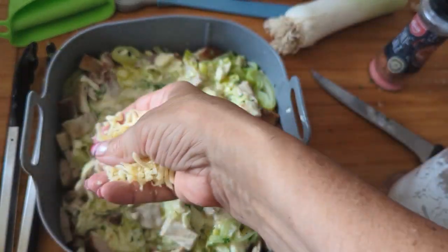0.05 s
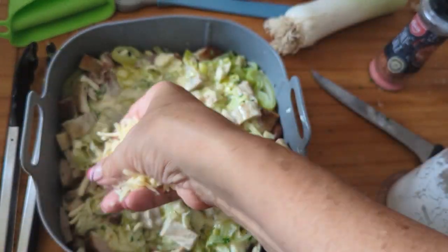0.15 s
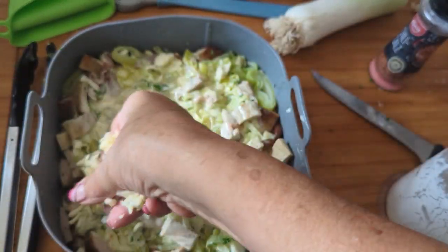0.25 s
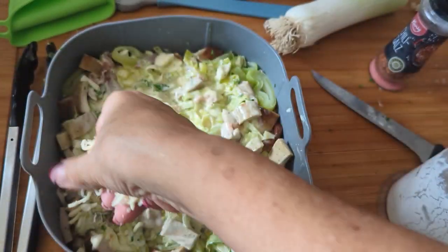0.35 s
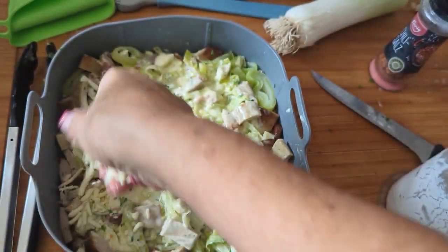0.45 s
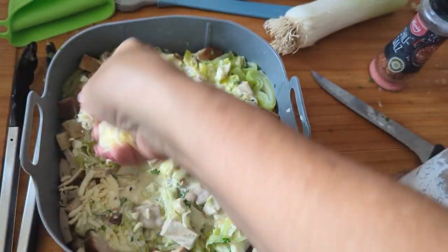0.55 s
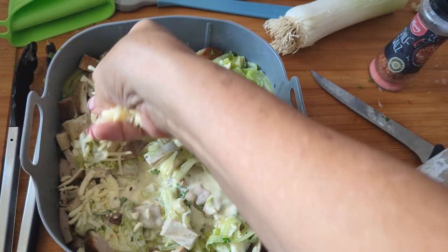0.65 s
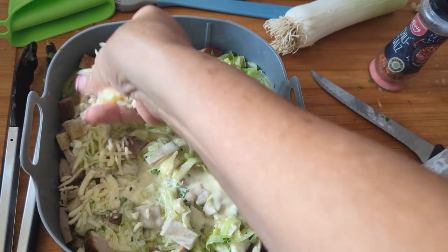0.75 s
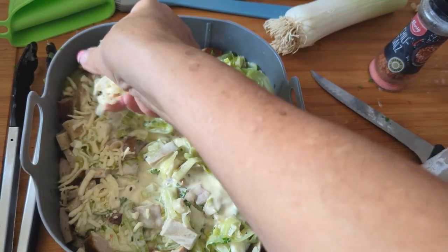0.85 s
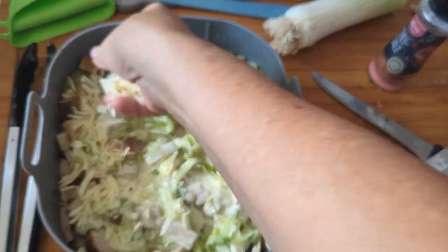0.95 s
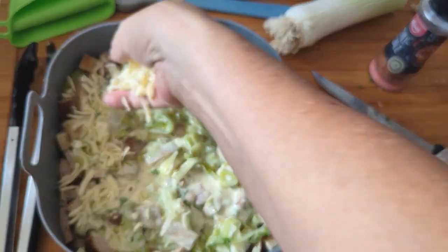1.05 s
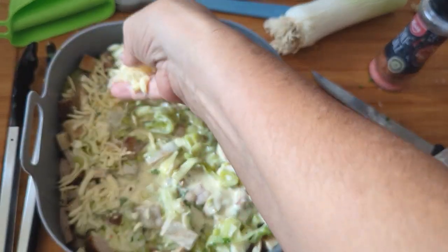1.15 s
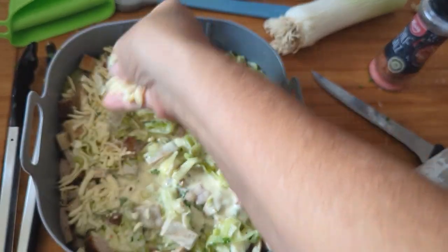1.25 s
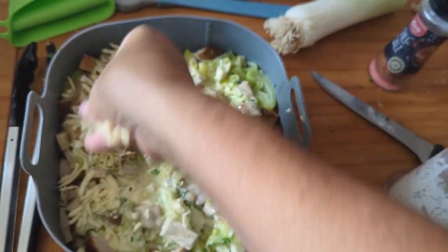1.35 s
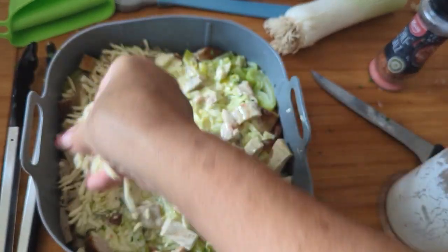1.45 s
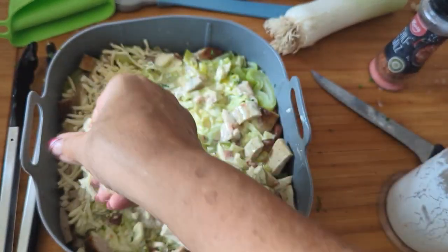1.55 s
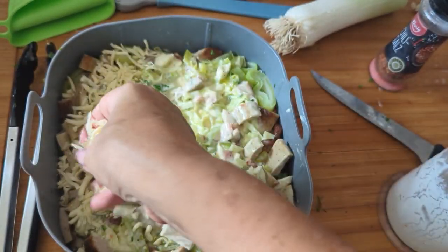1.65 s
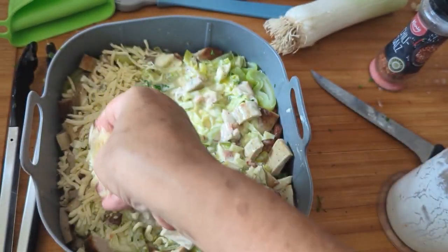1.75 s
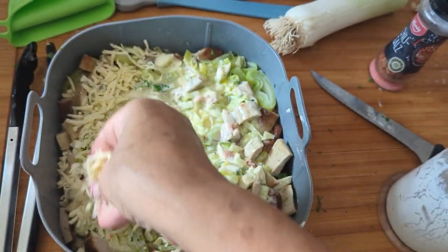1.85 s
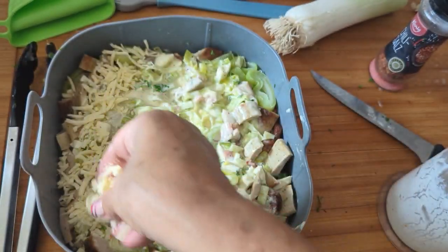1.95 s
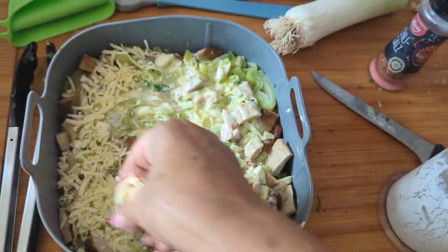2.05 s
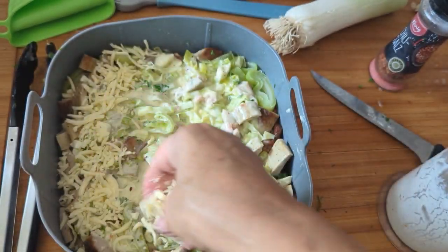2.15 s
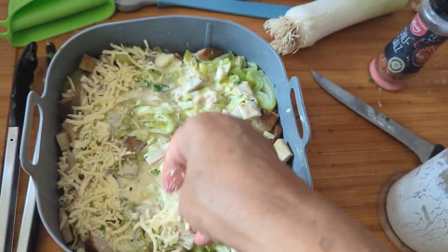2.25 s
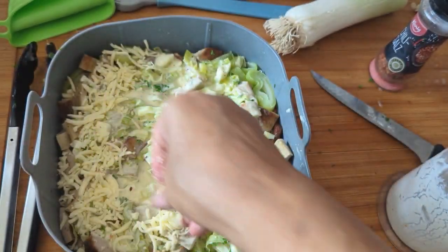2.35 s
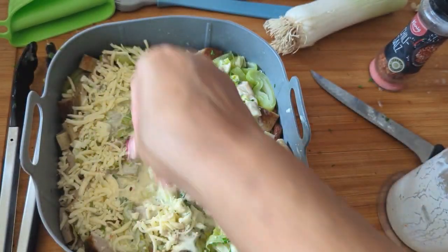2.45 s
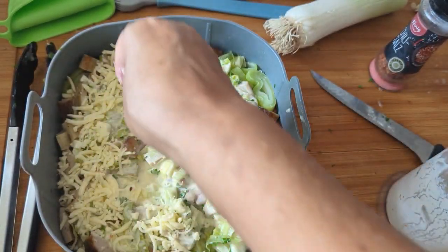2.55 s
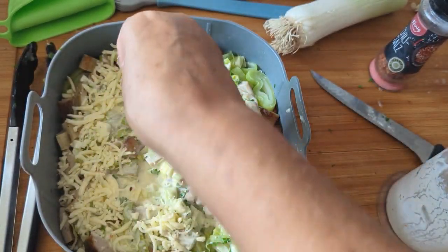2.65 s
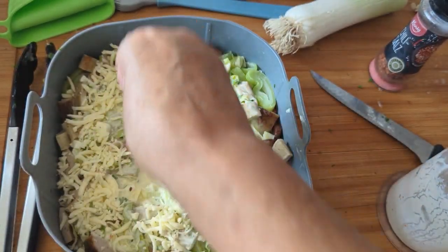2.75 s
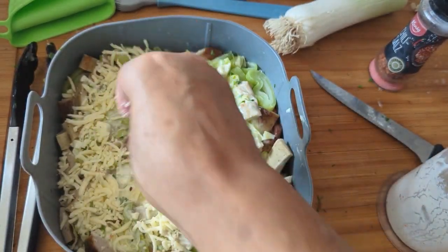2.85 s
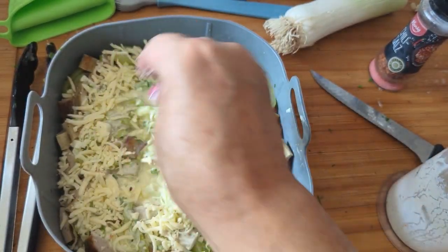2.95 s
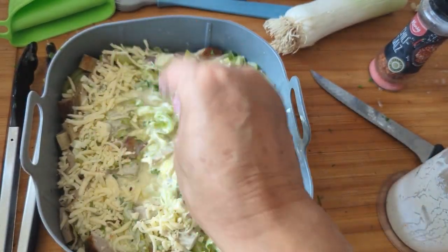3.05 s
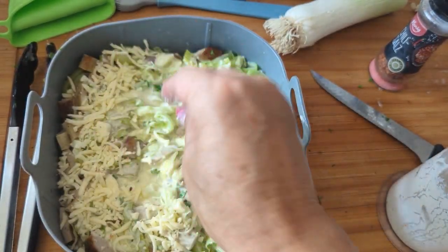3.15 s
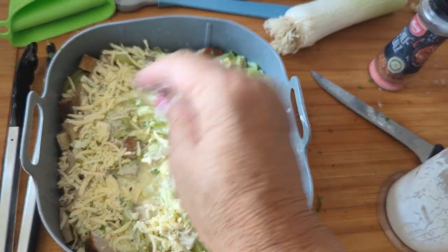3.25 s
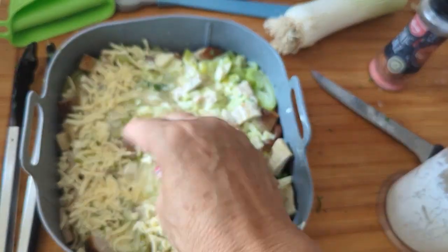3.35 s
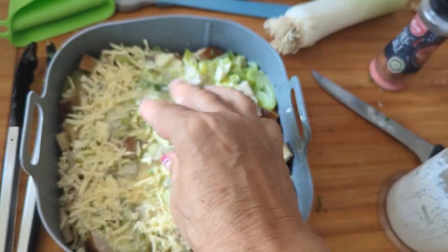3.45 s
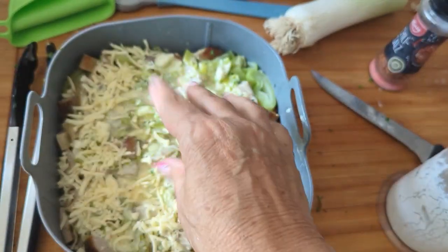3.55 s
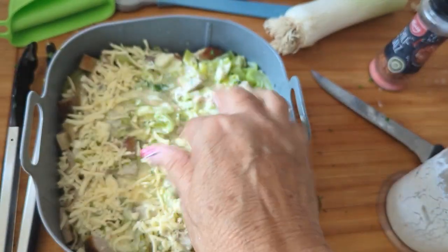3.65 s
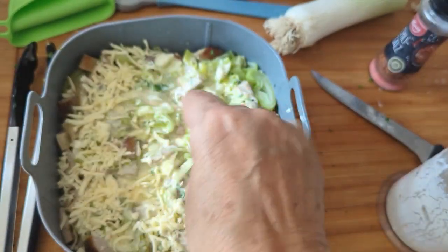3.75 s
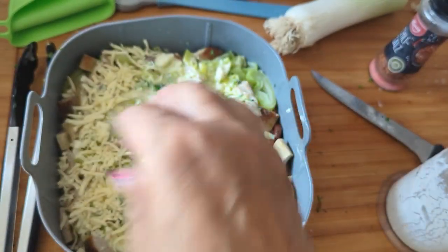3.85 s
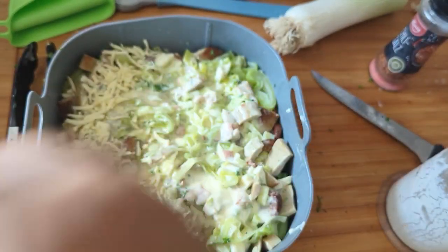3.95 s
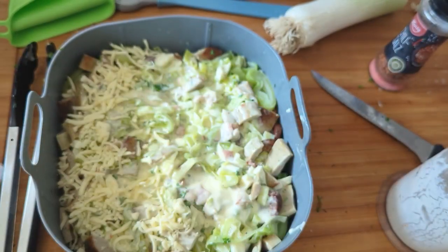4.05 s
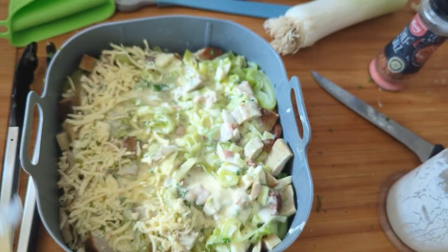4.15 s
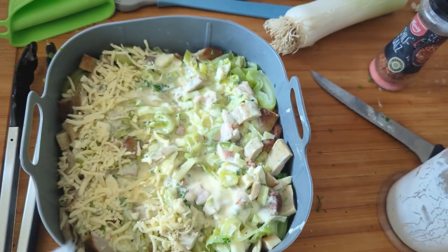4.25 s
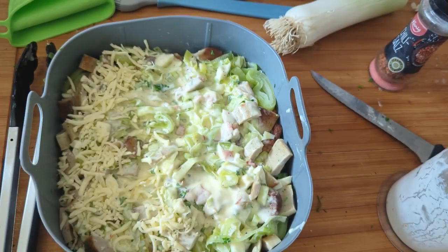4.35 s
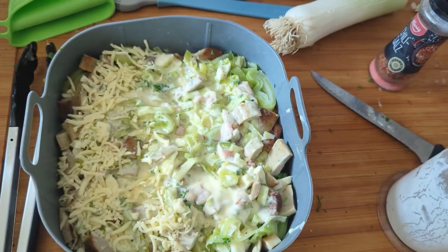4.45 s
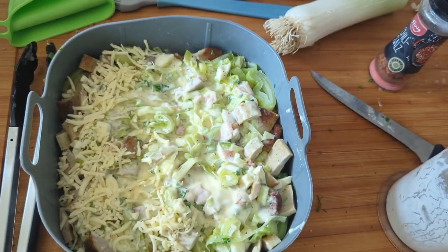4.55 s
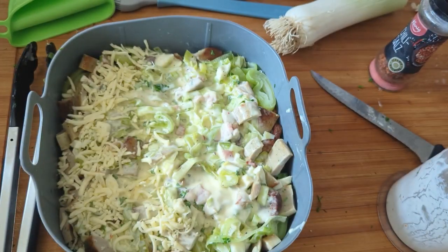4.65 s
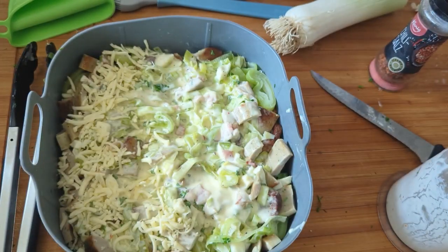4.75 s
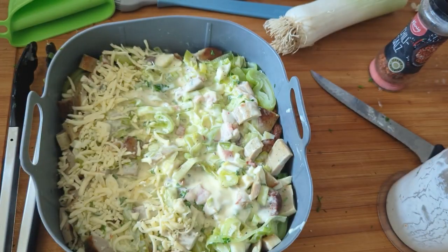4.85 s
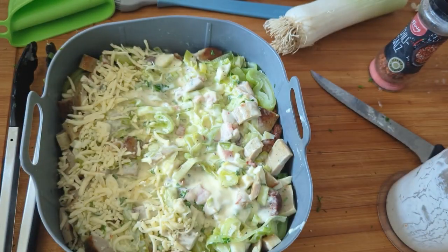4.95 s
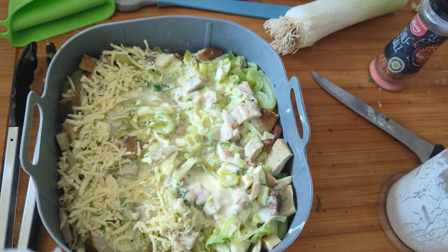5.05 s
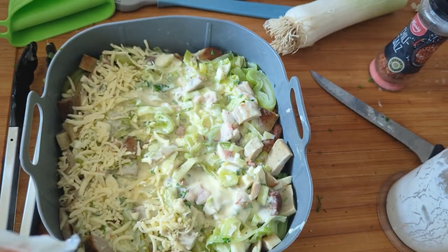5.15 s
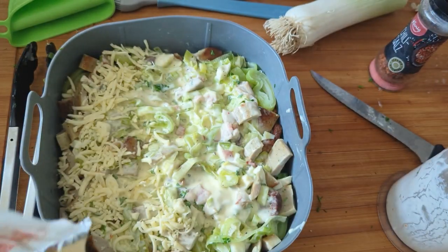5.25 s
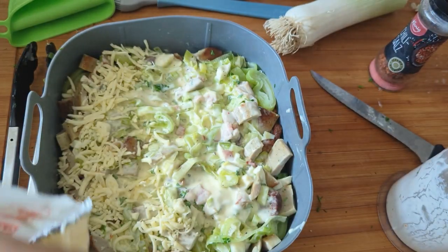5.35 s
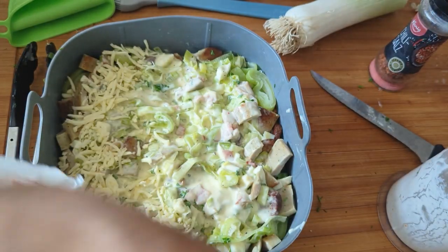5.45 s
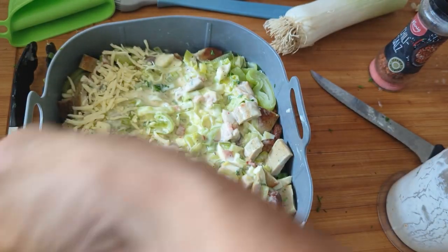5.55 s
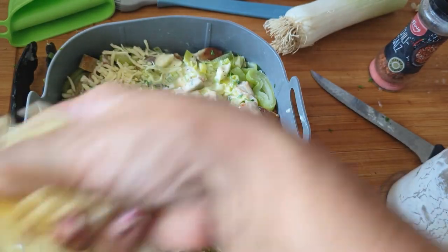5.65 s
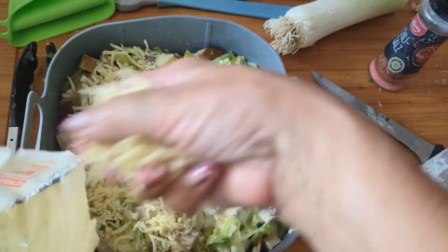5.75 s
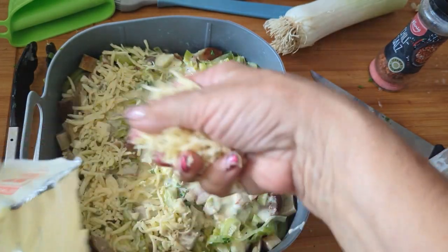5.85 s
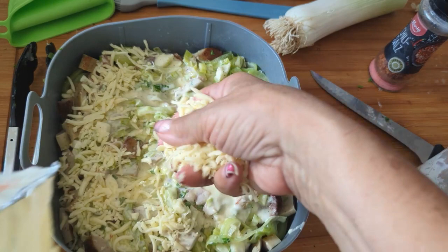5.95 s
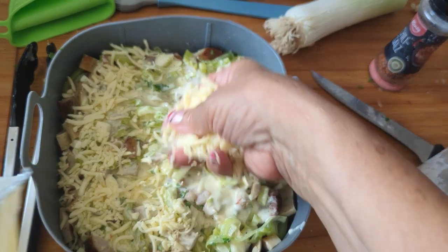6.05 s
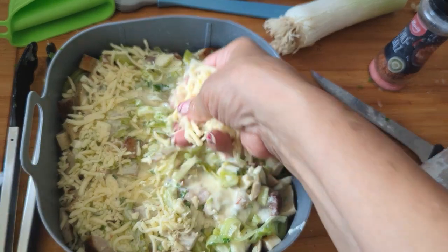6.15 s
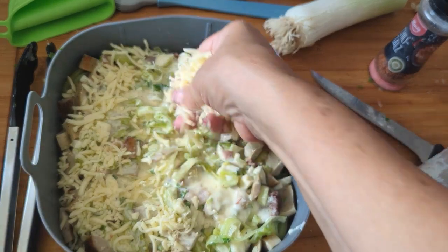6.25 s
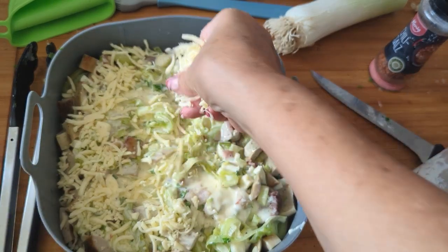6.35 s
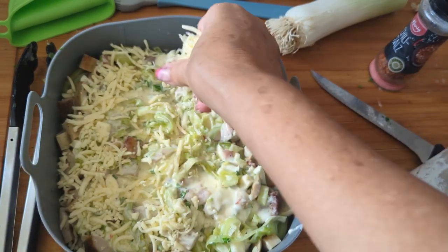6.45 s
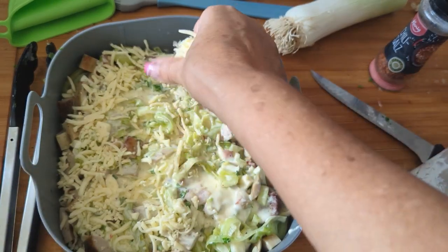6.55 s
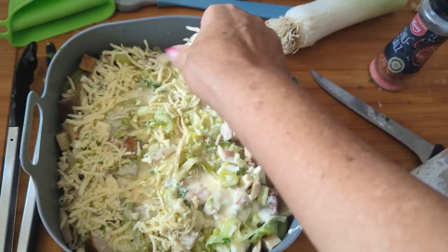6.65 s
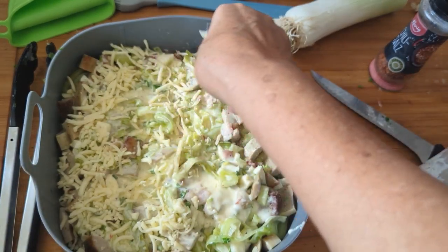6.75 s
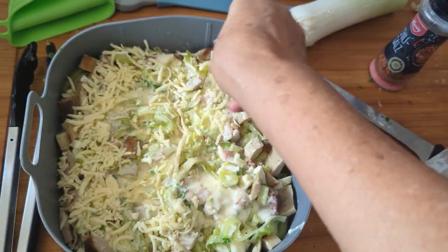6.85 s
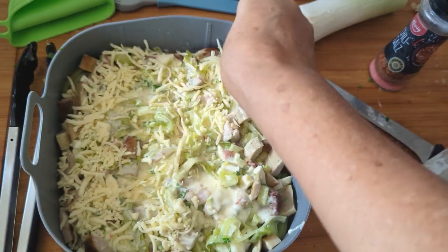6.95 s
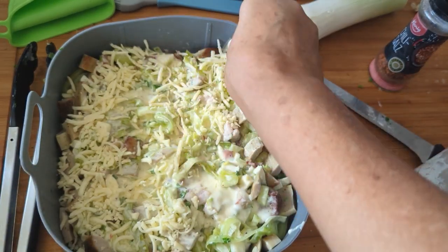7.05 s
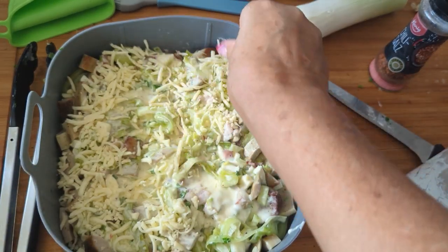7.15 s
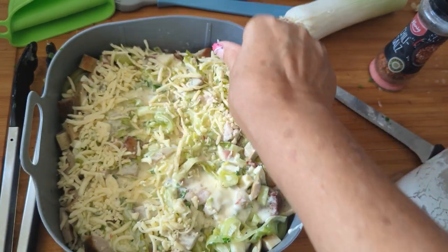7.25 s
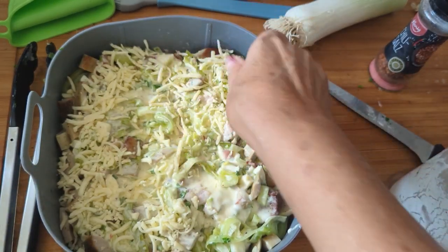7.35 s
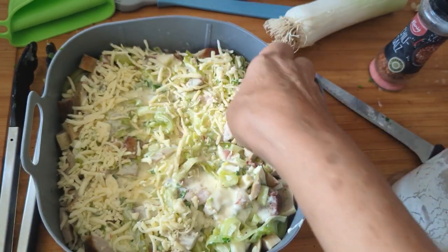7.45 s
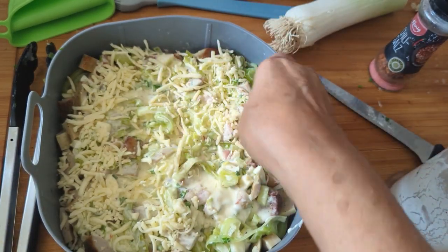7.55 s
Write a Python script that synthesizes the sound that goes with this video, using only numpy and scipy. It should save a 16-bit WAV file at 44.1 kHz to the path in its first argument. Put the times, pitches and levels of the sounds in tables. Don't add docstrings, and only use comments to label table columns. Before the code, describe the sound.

Close up in a small kitchen, a stiff plastic bag rustles and ticks briefly as it is put down. Quiet follows, with tiny film ticks over a low fridge hum and faint hiss. Just after the middle, a hand digs in: sharp dense snaps, crinkling, dull dents and low table bumps, thinning out to a few faint crumb knocks. Phone microphone, bag slightly to the right.

```python
import sys
import numpy as np
from scipy import signal
from scipy.fft import rfft, irfft, next_fast_len
from scipy.io import wavfile
from scipy.ndimage import uniform_filter1d

SR = 44100
rng = np.random.default_rng(int(sys.argv[2]) if len(sys.argv) > 2 else 0)


def magnitude_from_level(level_db):
    exponent = np.asarray(level_db, float) / 20
    return 10 ** exponent


def pcm_store(signal):
    levels = np.round(np.clip(np.atleast_2d(signal), -1, 1) * 32767)
    wavfile.write(sys.argv[1], SR, levels.astype(np.int16).T)


N = 334939
BURST, LEAD = 1500, 220
LEFT_LAG = 10
USUAL_PAN_DB = -4
LEFT_RIGHT = np.array([[.5], [-.5]])

# (time [s], snap level [dB], crease
# pitch [Hz], panel thud re snap [dB], top edge re snap [dB])
BUCKLE_SNAPS = [(4.1577, -50, 2415, 12, -29), (4.202, -23, 4795, -12, 8.5), (4.2093, -30, 3340, -6, 7),
                (4.252, -26.5, 3050, -0.5, -7), (4.2885, -25.5, 6520, -21, -15),
                (4.2988, -35.5, 4930, -18, 12), (4.3533, -24.5, 2545, -6.5, -20),
                (4.3838, -13.5, 4566, -20, 4), (4.4255, -27, 3580, 2.5, -10),
                (4.4434, -25.5, 2755, -11, -30.5), (4.508, -44, 2985, -10, -30.5),
                (4.5346, -33.5, 3420, 3.5, 0.5), (4.5485, -40, 6000, -10.5, 3.5),
                (4.7108, -27.5, 5940, -10, 1.5), (4.552, -31.5, 2924, 6, -24), (4.5628, -22, 4190, -17, 2),
                (4.5983, -29.5, 4010, 1, -2.5), (4.6119, -23.5, 4560, -9, 9), (4.651, -32.5, 3240, 6.5, -20),
                (4.6601, -30, 2350, 4.5, -12.5), (4.668, -23, 3410, -10, -5), (4.708, -14, 5320, -5.5, 14),
                (4.7155, -33.5, 7250, 5.5, -0.5), (4.7725, -30.5, 2420, 1, -25),
                (4.7806, -31, 2980, -0.5, -1.5), (4.8854, -19, 4420, -15.5, -1.5),
                (0.08, -40, 3800, 0, 12), (0.183, -32, 6530, -29, -14), (0.2223, -30, 5400, -9, -4),
               (0.3671, -51, 8060, -22, -4), (0.41, -34.5, 7500, -15, -10), (0.4293, -35.5, 5900, -5, -36),
               (0.485, -38.5, 5670, -5, 2), (0.6269, -26.5, 2600, -11, -14.5),
               (0.6258, -23.5, 6800, -8, -25), (3.2202, -43, 1660, -10, -16), (3.4678, -38, 2590, -16, -6),
               (3.4673, -38.5, 6100, -17, -2), (3.4819, -48, 2660, -11, 13.5),
               (5.2642, -39, 2370, 1.5, -26.5), (5.298, -30, 2470, -7, -12.5), (5.349, -22, 2300, -8, -0.5),
               (5.3603, -36.5, 2980, -8, -19), (5.5967, -28.5, 2300, -2.5, -27),
               (5.7415, -35, 2380, 1, -26), (5.7865, -48, 2720, 13, -31), (5.8423, -49.5, 3290, -26, 9)]
# (time [s], level [dB])
RELAX_TICKS = [(1.8715, -57.5), (1.9806, -58), (2.041, -60), (2.0522, -55), (2.062, -71), (2.085, -64),
               (2.167, -70), (2.527, -63), (2.545, -69), (2.255, -69), (2.288, -70), (2.096, -59),
               (2.138, -74), (2.1517, -60.5), (2.219, -67), (2.248, -58), (2.269, -61), (2.2784, -53),
               (2.321, -65), (2.396, -53.5), (2.459, -55), (2.4653, -67), (2.489, -59), (2.504, -53.5),
               (2.533, -59), (2.72, -69), (2.7768, -65), (2.875, -62), (5.856, -56), (5.914, -56),
               (6.05, -58)]
RELAX_HZ, RELAX_THUD_DB, RELAX_TOP_DB = 3990, 0, -2
# (time [s], level [dB])
NUDGE_TICKS = [
    (3.16, -49),
    (3.1944, -55),
    (3.268, -53),
    (3.315, -49),
    (3.366, -57),
    (3.4193, -51),
    (3.622, -51),
    (3.646, -57),
    (3.724, -69),
    (3.7737, -56),
]
NUDGE_HZ, NUDGE_THUD_DB, NUDGE_TOP_DB = 4000, -5.5, 1.5
# (time [s], slip [ms])
SLIP_TIMES = [(0.08, 4.3), (0.1844, 4), (0.2204, 1.2), (0.4296, 5.6), (0.484, 2.5), (0.6261, 2.9),
              (3.2192, 2.7), (3.4674, 2), (4.202, 2.2), (4.2093, 4.3), (4.252, 5.5), (4.2885, 3),
              (4.2988, 7.5), (4.3533, 4.8), (4.3838, 1.2), (4.4255, 7.7), (4.4434, 3.7), (4.5346, 2.1),
              (4.552, 2.3), (4.5628, 1.3), (4.6119, 1), (4.651, 6.3), (4.668, 1.3), (4.708, 0.41),
              (4.8854, 2.15), (5.297, 7), (5.349, 3.9), (5.3604, 5), (5.5968, 3.2), (5.7405, 2.3)]
USUAL_SLIP_MS, SLOW_SLIP_MS = 1.6, 5
LINGER_DB, LINGER_MS = -15, 5
# (time [s], left minus right [dB])
CREASE_FACING = [
    (4.2885, 6),
    (4.6119, -3),
    (4.668, 6.5),
    (4.706, -0.5),
    (4.7143, 2.5),
]
CREASE_RING_DB, CREASE_WIDTH = -3.5, 1.12
PANEL_HZ = 1150
TOP_LEFT_DB = 9.5
# (low [Hz], high [Hz], level [dB])
TOP_BANDS = [(10400, 13000, 0), (12800, 15800, -6.5), (6800, 7900, -1), (7900, 10400, -2.5)]

# (time [s], level [dB], pitch [Hz])
CRACKLE_TICKS = [(0.126, -42, 5200), (0.3875, -65, 2620), (0.445, -58, 2470), (0.462, -68, 3000),
                 (0.495, -71, 2500), (2.394, -52, 1700), (3.155, -50.5, 3470), (3.493, -42, 2120),
                 (4.1442, -45, 1830), (4.176, -41, 1860), (4.229, -33.5, 2880), (4.267, -39, 2500),
                 (4.309, -53, 1800), (4.392, -27, 3804), (4.438, -33, 2000), (4.653, -41, 4250),
                 (5.0126, -47, 1770), (5.353, -30.5, 3130), (5.543, -43, 2480), (5.589, -41, 1800),
                 (5.621, -45, 1310), (5.6372, -31, 2630), (5.7852, -42, 1290), (5.794, -40, 2880),
                 (5.812, -49, 2760), (5.843, -51.5, 3200), (5.857, -54, 3170), (5.886, -56, 1375),
                 (5.948, -54, 1400), (5.95, -56, 2750), (5.967, -59, 3180), (5.914, -52, 2980),
                 (5.598, -43, 1230), (5.703, -39, 1200), (4.506, -34.5, 2870), (4.534, -44, 2660),
                 (4.547, -34, 2800), (4.598, -33, 1010), (5.35, -37, 1565), (5.209, -44, 2840),
                 (2.059, -61, 1800), (2.269, -60, 1500), (2.51, -58, 1600), (3.315, -55, 1790),
                 (3.346, -51, 1700), (3.376, -53, 1700), (0.367, -39.5, 7800)]
CRACKLE_MS = 2.5
# (time [s], level [dB], pitch [Hz])
PANEL_PIPS = [(1.485, -69, 2010), (1.5648, -63, 2030), (2.335, -65, 1770), (3.226, -57, 1510),
              (4.506, -50, 4170), (4.6495, -37, 1320), (4.7726, -43.5, 1700), (5.4918, -46, 1050),
              (5.7025, -45, 1220), (5.741, -50, 2300), (5.726, -44, 530), (5.787, -45.5, 442),
              (5.843, -67, 2900), (5.843, -68, 5600), (5.858, -61, 3300), (5.86, -55, 1240),
              (5.87, -57, 1410), (5.886, -53.5, 1450), (5.951, -61, 2720), (5.951, -61, 1397),
              (5.962, -59.5, 904), (5.966, -73, 3250)]
PIP_CYCLES, PIP_LEAST_S = 34, 0.02
# (time [s], level [dB], pitch [Hz])
DULL_KNOCKS = [(4.1361, -39, 1450), (4.2278, -31, 1560), (4.4005, -21.5, 830), (4.4565, -26, 1120),
               (4.589, -25.5, 455), (4.818, -36, 1150), (4.8378, -27, 440), (4.9283, -30, 1460),
               (4.9457, -30.5, 990), (5.0612, -26, 1170), (5.095, -28, 1100), (5.142, -28.5, 1330),
               (5.2023, -44, 990), (5.208, -40, 1080), (5.3224, -30, 1150), (5.4658, -33, 1060),
               (5.4918, -31, 1000), (5.5273, -30, 1120), (5.5646, -28, 960), (5.5762, -30, 950),
               (5.6472, -22.5, 714), (5.67, -25, 900), (5.703, -34, 1220), (5.716, -39, 1150),
               (5.7252, -35, 534), (5.7616, -32, 1070), (5.7951, -27, 915), (5.8871, -34.5, 437),
               (0.149, -60, 850), (0.3385, -47, 635), (0.4385, -32.5, 950), (0.4469, -62, 714),
                (0.628, -37, 630), (1.056, -42.5, 1280), (1.485, -53, 1970), (1.5642, -51, 2030),
                (3.581, -43, 1190), (5.858, -47, 1290), (5.87, -39, 1330), (5.914, -54, 2600),
                (5.951, -58.5, 2670), (5.964, -64, 3170), (6.3095, -47.5, 922), (6.5964, -46.5, 1160),
                (7.1619, -44, 1534), (7.5819, -48, 630), (7.576, -44.5, 1300), (7.549, -48, 1350)]
DENT_MS_PER_KHZ = 2.54

# (start [s], hold [s], effort [dB], weight on the bag body [dB], tautness of the film [dB])
HAND_STROKES = [(0.0, .06, -52.5, -6, -9.5), (0.068, 0.056, -47, -3.5, -2.5),
                (0.139, 0.07, -47, -4.5, -2.5), (0.362, .05, -64, -0.5, -10.5),
                (0.431, 0.024, -53, -1.5, -8.5), (0.46, .035, -61, 0, -10),
                (0.622, 0.041, -69.5, 11.5, -29), (1.985, 0.14, -81, 4, -15),
                (2.232, 0.14, -79, 3.5, -14.5), (2.398, .15, -77, 2, -15.5),
                (3.151, 0.041, -64.5, -4.5, -16.5), (3.311, 0.015, -63.5, -9, -15.5),
                (3.472, 0.014, -54.5, -8, -10), (3.5, .06, -67.5, -3.5, -12), (3.56, 0.068, -70, -3, -9.5),
                (3.2, .2, -72.5, 2, -13), (3.885, 0.15, -56.5, -1.5, -5.5), (4.06, .07, -66, -10, -4),
                (4.146, 0.043, -53, -3, -8.5), (4.199, 0.023, -43.5, -6, -11.5),
                (4.251, 0.014, -42.5, -0.5, -8.5), (4.282, 0.042, -44.5, 1, -5),
                (4.355, 0.018, -39.5, -0.5, -9.5), (4.375, 0.022, -39.5, 2, -14.5),
                (4.394, 0.072, -43.5, 0.5, -7.5), (4.479, 0.028, -49.5, 2.5, -10.5),
                (4.539, 0.035, -43.5, 4.5, -9.5), (4.598, 0.01, -46.5, 1.5, -7.5),
                (4.645, 0.025, -42, -8, -9.5), (4.699, 0.074, -45, -8.5, -5.5),
                (4.779, 0.2, -56.5, 1.5, -12), (4.902, 0.28, -54, 4.5, -10.5), (5.065, 0.16, -53, 4, -13.5),
                (5.259, 0.069, -54, 0.5, -13.5), (5.348, 0.026, -47.5, -5, -8),
                (5.427, 0.22, -53.5, 0.5, -5.5), (5.565, 0.064, -49, 0, -7.5), (5.63, 0.051, -46, 3.5, -11),
                (5.712, 0.058, -55.5, 2, -13), (5.78, 0.026, -60, 7, -7.5), (5.845, 0.13, -75, 4, -13.5)]
RISE_DB_PER_S, FALL_DB_PER_S = 597.5, 258.5
# (frequency [Hz], density [dB per Hz])
FILM_COLOUR = [(150, -31.5), (250, -5), (525, 3.5), (635, -9.5), (961, 3), (1180, 11.5), (1850, -9),
               (2130, -15.5), (5790, -32.5), (6420, -16.5), (7250, -27.5), (10000, -30.5), (11800, -26),
               (15500, -38)]
FOLDS_DB = 3.5
GRAIN_DB, SLACK_GRAIN = 0.5, .35
# (part, level re part [dB], low [Hz], high [Hz], creases per second [1/s],
# rattle [s], share of graininess [ratio], port likeness [ratio])
RUSTLE_LAYERS = [("body", -4.5, 300, 900, 400, .003, .9, .9),
                 ("body", 0, 900, 2000, 900, .0015, .7, .8),
                 ("rustle", -0.5, 2000, 3800, 1200, .0015, .65, .6),
                 ("rustle", -6.5, 3800, 7000, 2000, .001, .55, .6),
                 ("sheen", 0, 7000, 16500, 3000, .0008, .6, .6)]
SLIDE_EDGE_HZ = 15750

# (start [s], hold [s], level [dB])
TABLE_BUMPS = [(0.056, 0.2, -55), (0.44, 0.047, -53), (0.532, 0.38, -63), (.85, 0.41, -62),
               (3.467, 0.023, -55), (3.896, 0.18, -59.5), (4.101, 0.078, -60), (4.224, 0.076, -48),
               (4.347, 0.092, -41.5), (4.492, 0.32, -55), (4.916, 0.023, -50.5), (5.027, 0.62, -56.5),
               (5.605, 0.17, -48.5), (5.886, 0.016, -52.5), (6.048, 0.32, -61.5)]
# (start [s], hold [s], level [dB])
DRONE_SWELLS = [
    (.2, .1, -51),
    (.43, .06, -53.5),
    (.66, .06, -60),
    (1.05, .05, -58),
    (1.85, .08, -53.5),
    (2.45, .06, -61),
    (4.08, .08, -55),
    (4.22, .2, -53.5),
    (5.5, .1, -52),
    (5.72, .1, -52),
]
SWELL_HZ = 50.2

# (frequency [Hz], time to fall 60 dB [s])
KITCHEN_ECHO = [(200, .4), (1000, .4), (4000, .33), (10000, .28), (16000, .2)]
# (frequency [Hz], density [dB per Hz])
RUMBLE_COLOUR = [(24, -29), (40, 0.5), (92, 1), (114, -6.5), (135, 2.5), (184, -5.5), (259, -12.5),
                 (342, -7), (469, -22), (503, -29.5), (650, -45.5), (840, -70.5), (1430, -120)]
RUMBLE_DB = -58.4
FRIDGE_HZ, FRIDGE_DB = 50.6, -64
# (frequency [Hz], density [dB per Hz])
HISS_COLOUR = [(350, -19), (520, -3.5), (700, -10.5), (900, -9), (1050, -6), (1700, -7), (1900, -13),
               (2400, -14.5), (3700, -18), (4100, -26.5), (6600, -33), (7900, -39.5), (15500, -43.5)]
# (time [s], level [dB], treble lift [dB])
HISS_DRIFT = [(0, -72, -12.5), (.75, -68.5, 8.5), (1.001, -66.5, 6), (1.251, -69.5, 1.5), (1.6, -69.5, -1),
              (2.3, -71, 3), (3, -71.5, 5), (3.8, -67, 4.5), (6, -68.5, 2), (6.3, -70, 2),
              (6.6, -69.5, 1.5), (7, -73, -2), (7.59, -68, -3.5)]
# (frequency [Hz], likeness [ratio])
PORT_LIKENESS = [(60, 0.79), (240, 0.94), (950, -0.24), (3770, -0.094), (15000, 0.4)]

EDGE_HZ = 16200
HUSH_DB, HUSH_HZ = 21, 4000
HUSH_START = 5


def evened(x):
    return x / np.sqrt(np.mean(x ** 2) + 1e-20)


def read(points, hz):
    f, value = np.transpose(points)
    return np.interp(np.log(hz + 1), np.log(f + 1), value)


def band(x, lo_hz, hi_hz, order=2):
    return signal.sosfilt(signal.butter(order, [lo_hz, hi_hz], "bandpass", fs=SR, output="sos"), x)


def colour(x, points):
    size = next_fast_len(N)
    gain = magnitude_from_level(read(points, np.fft.rfftfreq(size, 1 / SR)))
    return irfft(rfft(x, size) * gain, size)[..., :N]


def ports(near, other, likeness):
    likeness = np.clip(likeness, 0, 1)
    left = likeness * near + np.sqrt(1 - likeness ** 2) * other
    return np.array([np.roll(left, LEFT_LAG), near])


def setting_at(table, s, reach_s, usual):
    return next((value for at_s, value in table if abs(at_s - s) < reach_s), usual)


def add(mix, s, db, sound):
    at = round((s - .0009) * SR) - LEAD
    peak = np.sqrt(uniform_filter1d((sound ** 2).mean(0), 60).max())
    pan_db = setting_at(CREASE_FACING, s, .003, USUAL_PAN_DB) * LEFT_RIGHT
    mix[:, at:at + BURST] += magnitude_from_level(db + pan_db) * sound / peak


def held(start, hold, db):
    t = np.arange(0, N, 160)[:, None] / SR
    rise = RISE_DB_PER_S * np.maximum(start - t, 0)
    fall = FALL_DB_PER_S * np.maximum(t - start - hold, 0)
    return np.interp(np.arange(N) / SR, t[:, 0], (db - rise - fall).max(axis=1))


def buckle(draw, slip_ms):
    t = (np.arange(BURST) - LEAD) / SR
    *paths, slips = draw.reshape(-1, BURST)
    after = np.maximum(t, 0)
    fall = magnitude_from_level(-13 * after / (max(slip_ms, .5) / 1000)) * (1 - np.exp(-after / .0002)) ** 2
    patter = magnitude_from_level(LINGER_DB - 13 * after / (LINGER_MS / 1000)) * (t > 0)
    creep = magnitude_from_level(-37 + 2500 * np.minimum(t, 0)) * (t < .001)
    uneven = magnitude_from_level(3.5 * evened(uniform_filter1d(slips, 30)) * (abs(t - .0007) > .0007))
    step = 2.6 * (np.arange(BURST) == LEAD + 12) / np.sqrt(max(slip_ms, 1))
    return paths * (fall + patter + creep) * uneven + step


def snaps():
    out = np.zeros((2, N + 2000))
    rows = BUCKLE_SNAPS
    rows = rows + [(s, db, RELAX_HZ, RELAX_THUD_DB, RELAX_TOP_DB) for s, db in RELAX_TICKS]
    rows = rows + [(s, db, NUDGE_HZ, NUDGE_THUD_DB, NUDGE_TOP_DB) for s, db in NUDGE_TICKS]
    chance = rng.standard_normal((len(rows), 4 * BURST + 1))
    for (s, snap_db, crease_hz, thud_db, top_db), draw in zip(rows, chance):
        usual_ms = SLOW_SLIP_MS if 1.8 < s < 3.8 else USUAL_SLIP_MS
        near, other, low = buckle(draw[:-1], setting_at(SLIP_TIMES, s, .004, usual_ms))
        burst = ports(near, other, 0.02)
        crack = band(burst, crease_hz / 2.5, crease_hz * 1.64)
        ring = band(burst, crease_hz / CREASE_WIDTH, crease_hz * CREASE_WIDTH, order=1)
        add(out, s, snap_db - 5.0, crack + magnitude_from_level(CREASE_RING_DB) * ring)
        top = sum(magnitude_from_level(db) * band(burst, lo, hi) for lo, hi, db in TOP_BANDS)
        add(out, s, snap_db + top_db - 12.5, top * magnitude_from_level(TOP_LEFT_DB * LEFT_RIGHT))
        panel_hz = PANEL_HZ * np.exp(0.15 * np.clip(draw[-1], -2, 2))
        thud = band(ports(low, other, 0.89), panel_hz / 1.5, panel_hz * 1.5, order=1)
        add(out, s, snap_db + thud_db - 4.5, band(thud, 210, 3200))
    return out[:, :N]


def crackles():
    out = np.zeros((2, N + 2000))
    chance = rng.standard_normal((len(CRACKLE_TICKS), 3 * BURST))
    for (s, db, hz), draw in zip(CRACKLE_TICKS, chance):
        tick = ports(*buckle(draw, CRACKLE_MS), 0.087)
        add(out, s, db - 5.5, band(band(tick, hz / 1.2, hz), hz / 2.2, hz * 2.2, order=1))
    return out[:, :N]


def pips():
    out = np.zeros((2, N + 2000))
    t = np.maximum(np.arange(BURST) - LEAD, 0) / SR
    for (s, db, hz), draw in zip(PANEL_PIPS, rng.standard_normal((len(PANEL_PIPS), 2))):
        fall = magnitude_from_level(-60 * t / (PIP_LEAST_S + PIP_CYCLES / hz)) * (1 - np.exp(-t / .0007))
        detuned_hz = hz * (1 + 0.07 * draw[:, None])
        add(out, s, db, fall * (np.sin(2 * np.pi * hz * t) + .4 * np.sin(2 * np.pi * detuned_hz * t)))
    return out[:, :N]


def pocks():
    out = np.zeros((2, N + 2000))
    rows = DULL_KNOCKS
    for (s, db, hz), draw in zip(rows, rng.standard_normal((len(rows), 3 * BURST))):
        knock = ports(*buckle(draw, DENT_MS_PER_KHZ * hz / 1000), 0.75)
        add(out, s - .001, db - 10.5, band(band(knock, hz / 1.5, hz * 1.3), hz / 1.6, hz * 2.0, order=1))
    return out[:, :N]


def folds(x):
    z = signal.stft(x, nperseg=1024)[2]
    patches = uniform_filter1d(rng.standard_normal(z.shape[1:]), size=3, axis=0)
    patches = evened(uniform_filter1d(patches, size=9, axis=1))
    return evened(signal.istft(z * magnitude_from_level(FOLDS_DB * patches), nperseg=1024)[1][:, :N])


def rustle():
    out = np.zeros((2, N))
    film = folds(colour(rng.standard_normal((2, N)), FILM_COLOUR))
    start, hold, effort_db, weight_db, taut_db = np.transpose(HAND_STROKES)
    part_db = {"rustle": held(start, hold, effort_db),
               "body": held(start, hold, effort_db + weight_db),
               "sheen": held(start, hold, effort_db + taut_db)}
    grain_db = GRAIN_DB + SLACK_GRAIN * (part_db["rustle"] - part_db["sheen"])
    for part, db, lo, hi, per_s, rattle_s, share, alike in RUSTLE_LAYERS:
        size = np.minimum(rng.exponential(1, N), 2.5)
        sparks = (rng.random(N) < per_s / SR) * magnitude_from_level(np.clip(share * grain_db, 0, 4) * size)
        shake = signal.lfilter([1], [1, -np.exp(-1 / (rattle_s * SR))], sparks) + 0.61
        shake = shake / np.sqrt(uniform_filter1d(shake ** 2, 3000))
        layer = evened(band(ports(*(film * shake), alike), lo, hi, order=3))
        out += magnitude_from_level(part_db[part] + db + 1.5) * layer
    return out * magnitude_from_level(-2.6 * LEFT_RIGHT)


def bumps():
    near, other = band(rng.standard_normal((2, N)), 48.1, 360)
    return evened(ports(near, other, 0.82)) * magnitude_from_level(held(*np.transpose(TABLE_BUMPS)))


def drone_swells():
    swing = np.sin(2 * np.pi * SWELL_HZ * np.arange(N) / SR)
    return swing * uniform_filter1d(magnitude_from_level(held(*np.transpose(DRONE_SWELLS))), size=1500)


def kitchen(x):
    taps = np.zeros((2, SR // 2))
    at = np.arange(120, SR // 2 - 20, 20) + rng.integers(0, 20, (2, (SR // 2 - 121) // 20))
    np.put_along_axis(taps, at, rng.choice([-1., 1.], at.shape), 1)
    hz, t, z = signal.stft(taps, SR, nperseg=128)
    fall = magnitude_from_level(-60 * t / read(KITCHEN_ECHO, hz)[:, None])
    tail = signal.istft(z * fall, SR, nperseg=128)[1]
    return signal.fftconvolve(x, tail / np.linalg.norm(tail[0]), axes=1)[:, :N]


def background(points, patchy_db):
    frames, hz = N // 512 + 5, np.fft.rfftfreq(2048, 1 / SR)
    a, b, c, d, patches = rng.standard_normal((frames, 1025, 5)).T
    patches = evened(uniform_filter1d(uniform_filter1d(patches, 12, 0), 8, 1))
    same = np.clip(read(PORT_LIKENESS, hz), -1, 1)[:, None]
    left = a + 1j * b
    z = np.array([left, same * left + np.sqrt(1 - same ** 2) * (c + 1j * d)])
    z *= magnitude_from_level(read(points, hz)[:, None] + patchy_db * patches)
    return evened(signal.istft(z, nperseg=2048, noverlap=1536)[1][:, :N])


def hum():
    s, air_db, bright_db = np.transpose(HISS_DRIFT)
    t = np.arange(N) / SR
    drone = band(rng.standard_normal((2, N)), FRIDGE_HZ - 5, FRIDGE_HZ + 5)
    drone = magnitude_from_level(FRIDGE_DB) * evened(ports(*drone, 0.9))
    rumble = magnitude_from_level(RUMBLE_DB) * background(RUMBLE_COLOUR, 0.95) * magnitude_from_level(-1.2 * LEFT_RIGHT)
    hiss = background(HISS_COLOUR, 1.4)
    hiss = hiss + (magnitude_from_level(np.interp(t, s, bright_db)) - 1) * band(hiss, 2600, 6200, order=1)
    return drone + rumble + magnitude_from_level(np.interp(t, s, air_db) + 1.5) * hiss


def scene():
    bag = snaps() + pocks() + crackles() + pips()
    slide = rustle()
    spread = slide + magnitude_from_level(-13.5) * kitchen(bag + .8 * slide)
    spread = signal.oaconvolve(spread, signal.firwin(401, SLIDE_EDGE_HZ, fs=SR)[None], "same")
    return bag + spread + bumps() + hum() + drone_swells()


def hush_treble(x):
    hz, t, z = signal.stft(x, SR, nperseg=256)
    power = uniform_filter1d((abs(z) ** 2).mean(0), size=6, axis=0)
    starts = np.r_[0, np.arange(HUSH_START, len(t), 8)]
    lengths = np.diff(np.r_[starts, len(t)])
    peak = np.repeat(np.maximum.reduceat(power, starts, axis=1), lengths, axis=1)
    keep = (power > peak * magnitude_from_level(-HUSH_DB) ** 2) | (hz[:, None] < HUSH_HZ)
    return signal.istft(z * keep, SR, nperseg=256)[1][:, :N]


def roll_off(x):
    return signal.sosfilt(signal.butter(12, 16680, fs=SR, output="sos"), x)


def record(dry):
    cut = signal.sosfilt(signal.butter(8, 41, "highpass", fs=SR, output="sos"), dry)
    top_edge = signal.firwin(255, EDGE_HZ, window=("kaiser", 8), fs=SR)[None]
    cut = signal.oaconvolve(np.clip(cut, -.99, .99), top_edge, "same")
    mix = hush_treble(cut)
    return roll_off(mix)


dry = scene()
out = record(dry)
pcm_store(out)
```